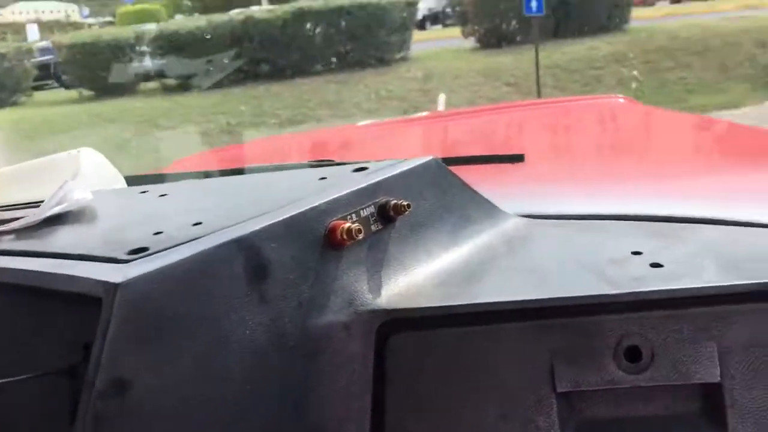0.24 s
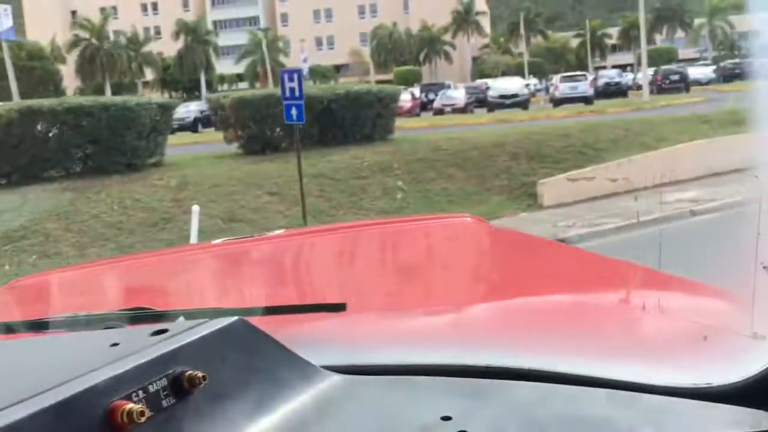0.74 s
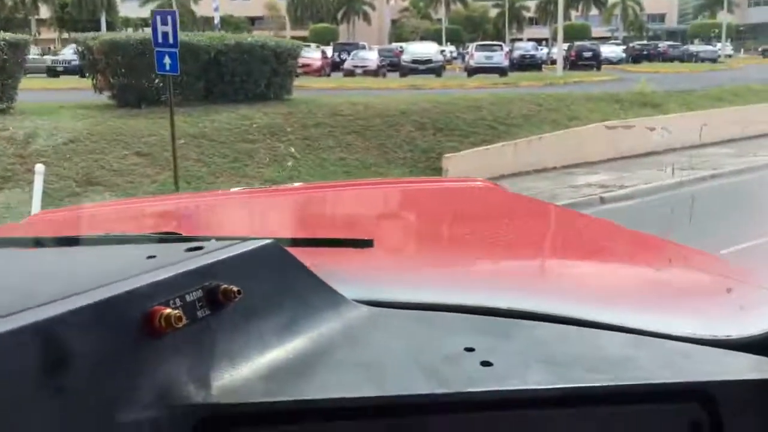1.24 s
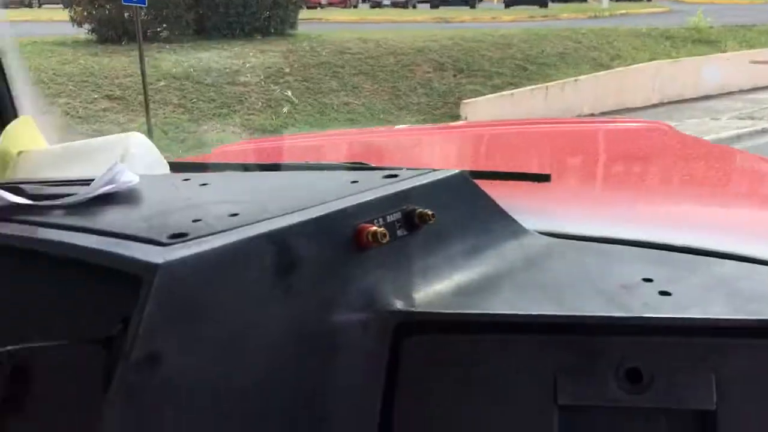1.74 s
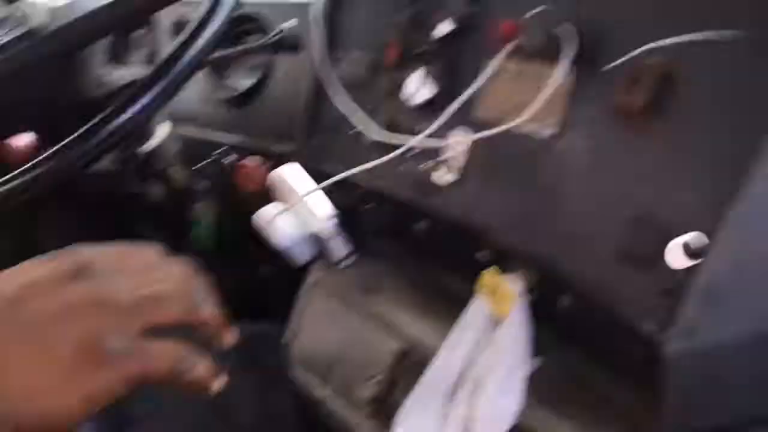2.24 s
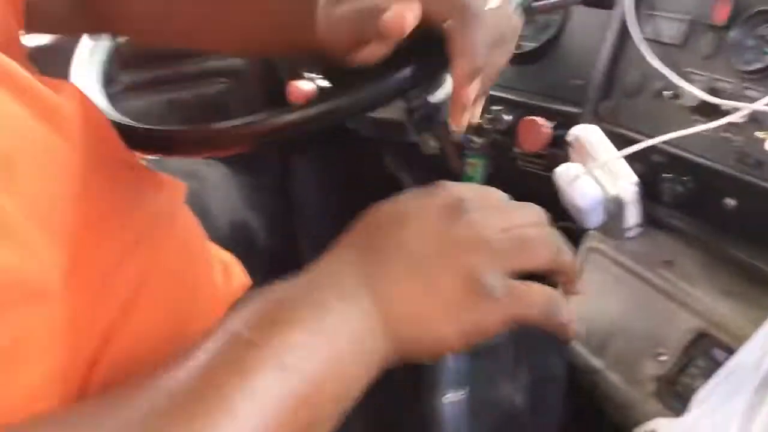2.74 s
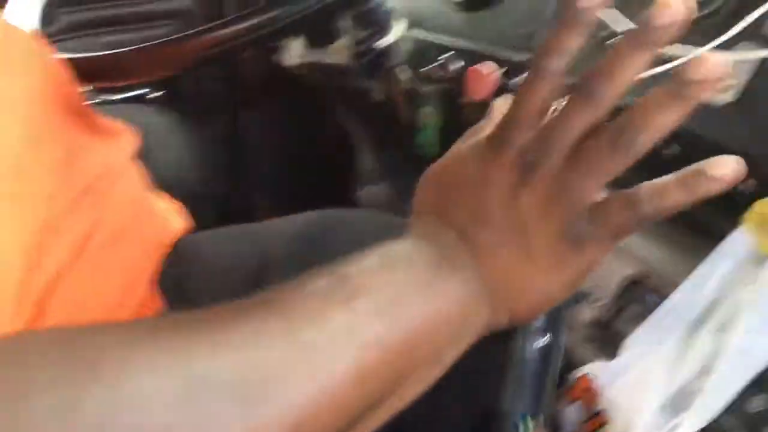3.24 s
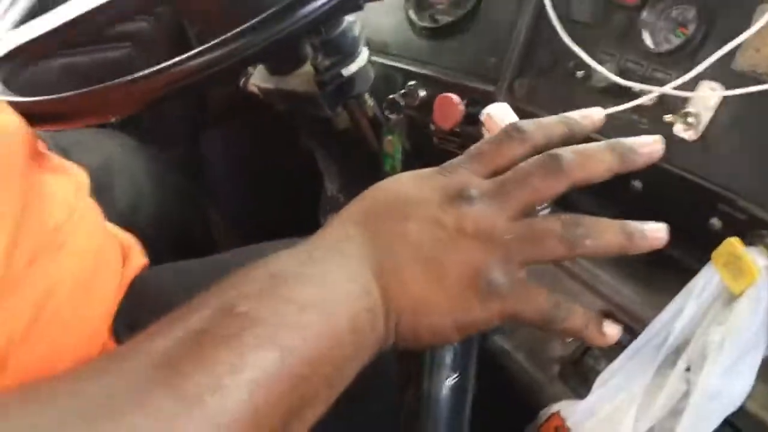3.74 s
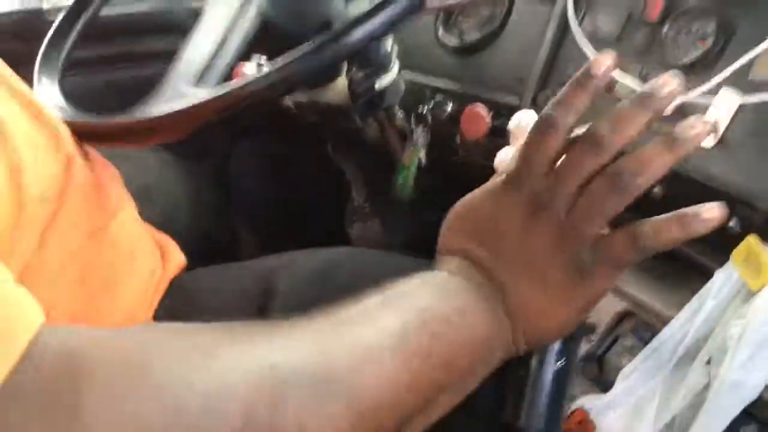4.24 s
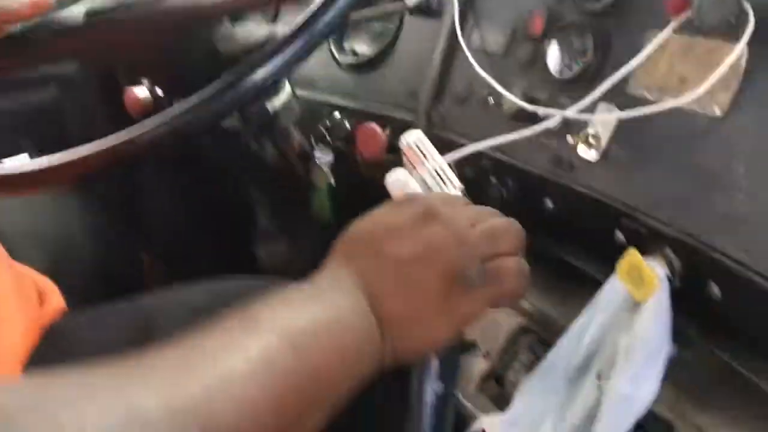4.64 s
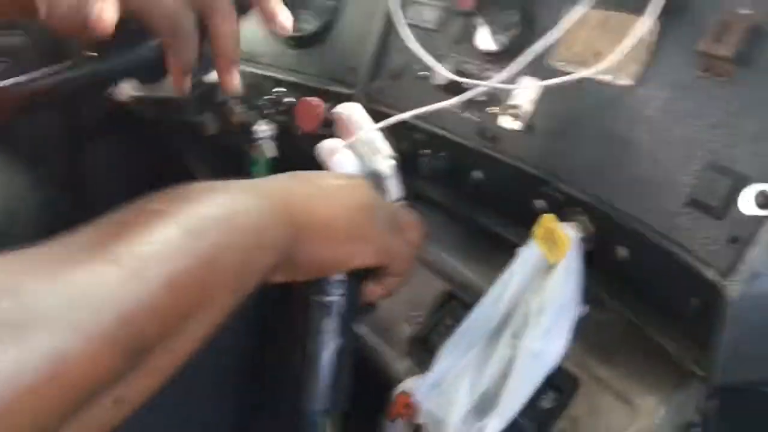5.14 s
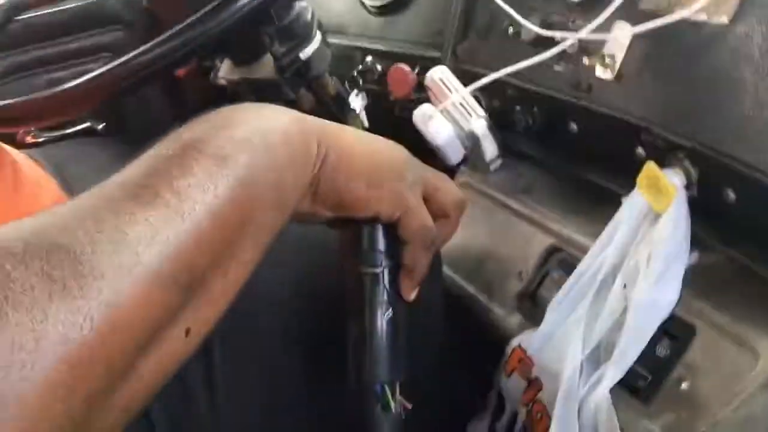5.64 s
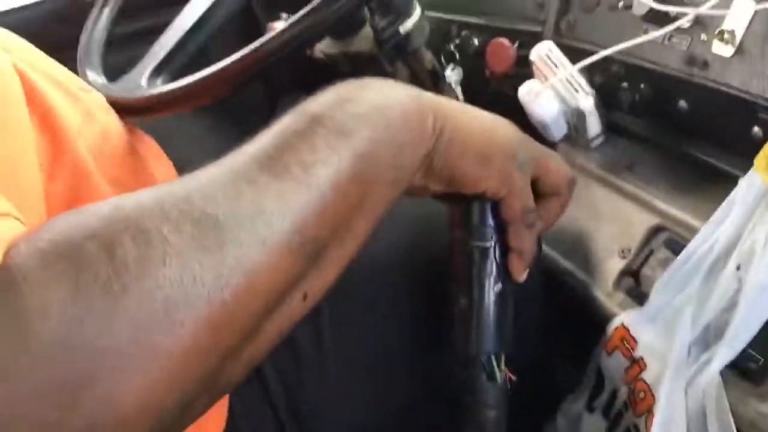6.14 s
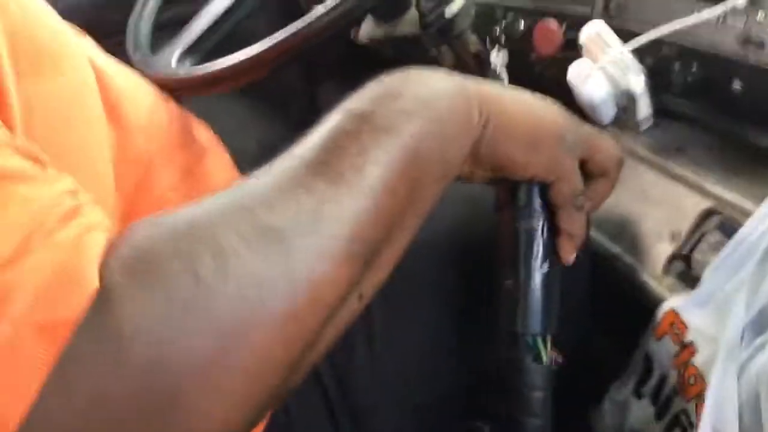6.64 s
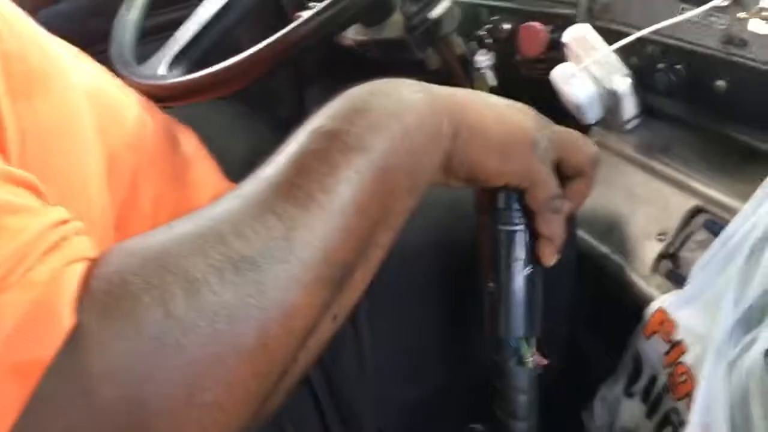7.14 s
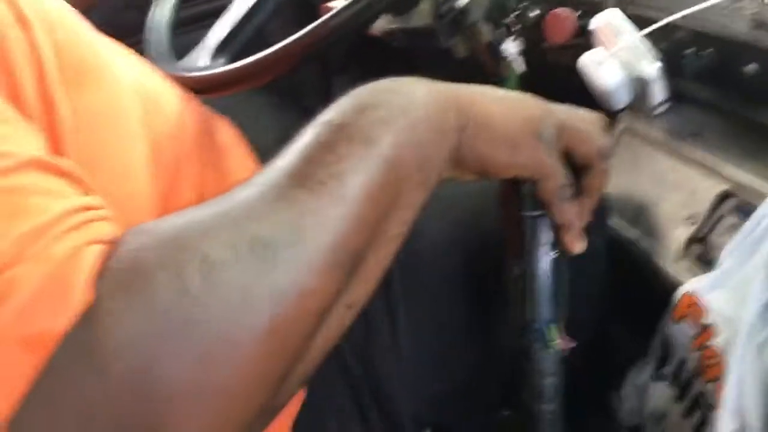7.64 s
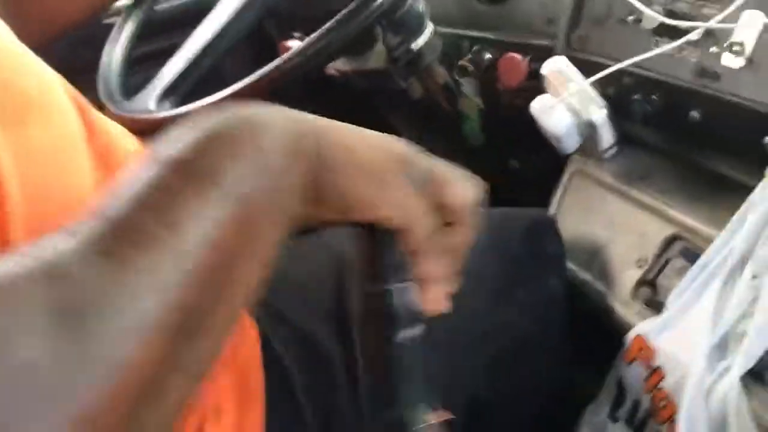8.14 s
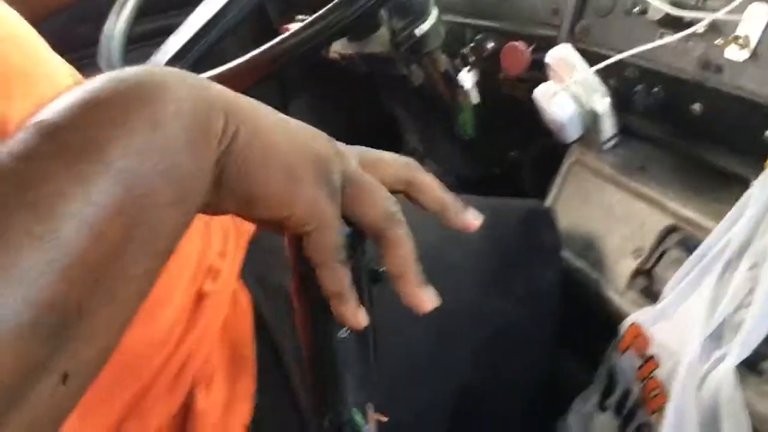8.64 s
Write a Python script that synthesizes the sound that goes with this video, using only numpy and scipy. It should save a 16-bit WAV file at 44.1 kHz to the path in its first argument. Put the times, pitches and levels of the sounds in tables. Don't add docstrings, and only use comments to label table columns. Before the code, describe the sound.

A loud truck diesel pulls hard, drops off, grinds and clunks into the next gear, then climbs again under a breathy turbo whistle.

```python
import sys
import numpy as np
from scipy import signal
from scipy.fft import rfft, irfft
from scipy.io import wavfile
from scipy.ndimage import uniform_filter1d

SR = 44100
rng = np.random.default_rng(int(sys.argv[2]) if len(sys.argv) > 2 else 0)


def master_out(mix):
    frames = np.transpose(np.atleast_2d(mix))
    ceiling = np.clip(frames, -1, 1)
    pcm = np.round(ceiling * 32767).astype(np.int16)
    wavfile.write(sys.argv[1], SR, pcm)


def how_loud(loudness_db):
    steps = np.asarray(loudness_db, float) / 20
    return 10 ** steps


N = 392931
TIME = np.arange(N) / SR

# time in seconds, effort in dB.
EFFORT = [(0, 5), (.15, -1), (1.4, 2), (2.0, 0.5), (2.7, -3.5), (3.06, -4), (3.2, 3), (3.38, 4),
          (3.6, -1.5), (3.8, 0.5), (4.15, 7), (4.3, 5.5), (4.5, 3.5), (6.0, 0.5), (7.0, -2.5), (8.05, -4),
          (8.36, -1), (8.7, 5.5)]


def level(x, db):
    return x * how_loud(db) / np.sqrt(np.mean(x ** 2))


def columns(table):
    s, *rest = np.transpose(table)
    return [np.interp(TIME, s, c) for c in rest]


def law(value, points):
    return np.interp(value, *np.transpose(points))


def walk(rate):
    return np.interp(TIME * rate, np.arange(1000), rng.standard_normal(1000))


def coloured(points):
    hz, db = np.transpose(points)
    f = np.maximum(np.arange(N // 2 + 1) * SR / N, 1)
    tilt = how_loud(np.interp(np.log(f), np.log(hz), db))
    return level(irfft(rfft(rng.standard_normal(N)) * tilt, N), 0)


def filtered(x, order, hz, kind):
    return signal.sosfilt(signal.butter(order, hz, kind, fs=SR, output="sos"), x)


def ring(x, modes, rate=0):
    total = 0
    for k, (hz, width, db) in enumerate(modes):
        swell_db = 3 * np.tanh(walk(rate)) if rate else 0
        mode = signal.lfilter(*signal.iirpeak(hz, hz / width, SR), x)
        total = total + (-1) ** k * how_loud(db + swell_db) * mode
    return total


def smeared(turns, width_hz):
    clock = np.cumsum(np.broadcast_to(width_hz, N)) / SR
    a, b = (np.interp(clock, np.arange(N), rng.standard_normal(N)) for _ in range(2))
    return a * np.sin(2 * np.pi * turns) + b * np.cos(2 * np.pi * turns)


def hits(events, carrier):
    shape = np.zeros(N)
    for s, db, t60 in events:
        start = int(s * SR)
        after = TIME[start:int((s + 2 * t60) * SR)] - s
        shape[start:start + len(after)] += how_loud(db - 60 * after / t60) * np.clip(after / 0.00019, 0, 1)
    return shape * carrier


def bumps_db(events):
    return sum(db * np.exp(-((TIME - s) / half) ** 2) for s, half, db in events)


def firing_rate():
    # time in seconds, firing rate in Hz.
    revs = [(0, 53.9), (.25, 54.98), (1.27, 73.1), (2.36, 94.15), (2.66, 95.8), (2.8, 86.96), (3.25, 81.9),
            (3.54, 96.6), (3.78, 95.2), (3.97, 68.34), (4.19, 66.55), (4.33, 60), (6.7, 85.67),
            (7.88, 96.2), (7.99, 87.15), (8.44, 72.55), (8.66, 72.7), (8.8, 70.4)]
    since = np.maximum(TIME - 4.27, 0)
    return columns(revs)[0] - 3.205 * np.sin(2 * np.pi * since / .41) * np.exp(-since / 1.26)


def boom_level(hz, fuel_db):
    # firing rate in Hz, boom in dB.
    cab_boom = [(50, -8), (55, -12.5), (63, -13), (72, -14), (80, -14), (89, -11), (95, -8)]
    # time in seconds, half length in seconds, boom in dB.
    surges = [
        (2.8, 0.011, -25),
        (2.937, 0.014, -13.5),
        (3.826, 0.023, -21),
        (4.07, 0.04, -23),
        (4.144, 0.033, -22),
        (4.28, 0.037, -10.5),
    ]
    coasting = np.clip(-fuel_db / 15, 0, 1) ** 2
    rocking = sum(how_loud(db) * np.exp(-((TIME - s) / half) ** 2) for s, half, db in surges)
    return 20 * np.log10(how_loud(law(hz, cab_boom) + fuel_db + 2 * coasting * walk(22)) + rocking)


def cab_boom_tones(cycles, hz, fuel_db, boom_db, cancel_hz):
    # firing rate in Hz, octave in dB.
    cab_octave = [(53, -23), (58, -19), (64, -19), (77, -23), (86, -30), (90, -30), (93, -28.5),
                  (96, -36.5)]
    cancelling = 0.017 + np.tanh(((hz - cancel_hz) / 4.2) ** 2)
    octave_db = law(hz, cab_octave) + 2.2 * fuel_db + 20 * np.log10(cancelling)
    boom = how_loud(boom_db + 0.2 * walk(18)) * np.sin(2 * np.pi * cycles)
    boom += how_loud(octave_db + 0.41 * walk(45)) * np.cos(2 * np.pi * (2 * cycles + .66))
    return np.sqrt(2) * boom


def exhaust_pipe(puffs, hz):
    # resonance in Hz, width in Hz, level in dB.
    pipe_modes = [(159.8, 11.4, 8), (186, 124, -14), (282, 9.2, -22)]
    pipe = filtered(ring(puffs, pipe_modes), 4, 140, "high")
    return level(pipe, -26.5) * np.clip((78 - hz) / 12, 0, 1)


def floor_panels(knocks, hz, fuel_db, boom_db, wake_hz, plate_db):
    # resonance in Hz, width in Hz, level in dB.
    panel_modes = [(56.4, 28, -1.5), (105.5, 30.3, 2.5), (186.1, 18.7, -6), (294.8, 22.3, -5.5),
                   (345.5, 54, -11), (676, 50, -7)]
    plate_hz = [392, 434]
    skirt_hz = [265, 385]
    # time in seconds, half length in seconds, extra dB.
    growls = [
        (2.31, 0.081, 4.5),
        (3.45, .07, 5.5),
        (4.273, 0.033, 10),
        (4.65, 0.27, 4),
        (8.62, 0.052, 9.5),
    ]
    load_db = uniform_filter1d(boom_db, SR // 10)
    panels = level(ring(ring(knocks, panel_modes), panel_modes), -14.5)

    rasp = level(rng.standard_normal(N), -10)
    plate = level(filtered(level(knocks, 0) + rasp, 3, plate_hz, "band"), 0)
    plate_db = plate_db - 1.28 * np.maximum(wake_hz - hz, 0) + 1.52 * fuel_db + 1.46 * walk(9)
    plate_db += bumps_db(growls)

    skirt = level(filtered(knocks, 2, skirt_hz, "band"), -10)
    skirt *= np.clip((94 - hz) / 14, 0, 1) * np.clip((hz - 54) / 18, .15, 1)
    return panels * how_loud(load_db) + skirt * how_loud(load_db - 7.5) + plate * how_loud(plate_db - 7.0)


def combustion_clatter(cycles, fuel_db, strain_db):
    # frequency in Hz, noise density in dB per Hz.
    clatter_spectrum = [(280, 0), (470, 1.5), (538, -1.5), (648, 2), (861, -2.5), (962, -1.5), (1140, -5),
                        (1340, -7), (2230, -10), (4970, -19), (7660, -24.5), (9000, -27.5), (11700, -67),
                        (19800, -120)]
    # resonance in Hz, width in Hz, level in dB.
    ringing = [(567, 9.1, -4.5), (716, 28, -5.5), (960, 50, -0.5), (1371, 41, 8), (1880, 8, 0),
               (2073, 60, 8), (2344, 36, 2), (2645, 34, 9), (3555, 220, -7.5), (3740, 23, -18)]
    gate = 1.9 + np.exp(-(cycles % 1) / 0.9)
    hiss = coloured(clatter_spectrum)
    block = level(ring(hiss, ringing, rate=7), -6.0) * how_loud(strain_db + 0.83 * fuel_db)
    clatter = level(gate * (hiss + block), 0)
    return clatter * how_loud(-32 + columns(EFFORT)[0] + 1.35 * walk(9))


def gear_mesh(hz):
    # multiple of firing rate, start in seconds, end in seconds, level in dB.
    mesh_tones = [
        (32.8, 6.55, 7.93, -52),
        (38.9, 6.3, 6.75, -48),
        (43.9, 7.1, 7.91, -50.5),
    ]
    steady = np.cumsum(uniform_filter1d(hz, SR // 12)) / SR
    whine = 0
    for teeth, a, b, db in mesh_tones:
        fade = np.interp(TIME, [a, a + 0.11, b - .05, b], [0, 1, 1, 0])
        tone = np.sin(2 * np.pi * teeth * steady) + .5 * smeared(teeth * steady, 25)
        whine = whine + how_loud(db) * fade * tone
    return whine


def engine():
    # time in seconds, fuel in dB.
    pedal = [(2.45, 0), (2.7, -5), (2.75, -23), (3.1, -14.5), (3.28, -2), (3.36, -2), (3.54, -0.5),
             (3.62, -8.5), (3.68, -12), (3.71, -18), (4.18, -8), (4.23, 3), (4.5, 1), (7.89, -0.5),
             (7.96, -18), (8.44, -12.5), (8.46, -2.5), (8.63, 2.5)]
    # start in seconds, firing rate in Hz up to which
    # the floor plate wakes, firing rate in Hz where the octave cancels, plate in dB, block ring in dB.
    gears = [
        (0, 78.84, 70.05, -18, 3),
        (3.1, 90.64, 95.9, -23, -2.5),
        (4.0, 71.66, 73.1, -15, -1),
        (8.199, 70, 75.56, -20.5, -8),
    ]
    cylinders = [0, -17, -22, -2.5, -19, -22]
    hz = firing_rate()
    fuel_db = columns(pedal)[0]
    by_gear = np.transpose(gears)
    gear_now = np.searchsorted(by_gear[0], TIME, "right") - 1
    wake_hz, cancel_hz, plate_db, strain_db = by_gear[1:, gear_now]
    boom_db = boom_level(hz, fuel_db)
    cycles = np.cumsum(hz * (1 + 0.0034 * walk(25))) / SR

    firings = np.flatnonzero(np.diff(np.floor(cycles)))
    scatter_db = 1.2 * rng.standard_normal(len(firings))
    puffs, knocks = np.zeros((2, N))
    puffs[firings] = how_loud(boom_db[firings])
    knocks[firings] = how_loud(np.resize(cylinders, len(firings)) + scatter_db)

    sound = cab_boom_tones(cycles, hz, fuel_db, boom_db, cancel_hz)
    sound += exhaust_pipe(puffs, hz)
    sound += floor_panels(knocks, hz, fuel_db, boom_db, wake_hz, plate_db)
    sound += combustion_clatter(cycles, fuel_db, strain_db)
    return sound + gear_mesh(hz)


def turbo():
    # time in seconds, lower wheel tone in Hz.
    spool = [(0, 5620), (.65, 7300), (1.0, 8320), (1.45, 9100), (1.85, 9750), (2.58, 10650), (2.8, 8670),
             (3.2, 6540), (3.52, 6805), (4.2, 5120), (5.1, 8150), (5.64, 9146), (6.35, 9925), (7.0, 10400),
             (7.89, 10750), (8.1, 8400), (8.5, 6397), (8.91, 7760)]
    # frequency in Hz, level in dB.
    blade = [(7300, -40), (8500, -38), (10500, -39.5), (13000, -39.5), (14500, -49), (15500, -47)]
    # frequency in Hz, level in dB.
    wheel = [(6300, -62), (7200, -56), (8100, -48.5), (8750, -44), (9100, -35), (9450, -45), (9800, -37.5),
             (10250, -53.5)]
    # frequency in Hz, noise density in dB per Hz.
    air_spectrum = [(2350, -23), (4000, 1.5), (4940, -7), (6000, -2), (7250, -8), (9260, -5), (10400, -8),
                    (12800, -9), (15700, -15)]
    wheel_hz = uniform_filter1d(columns(spool)[0], SR // 12)
    speeding_up = np.gradient(uniform_filter1d(wheel_hz, SR // 8)) > 0
    boost = uniform_filter1d(1. * speeding_up, SR // 8)

    blade_hz = wheel_hz * (1.435 - .03 * boost)
    width_hz = (700 + 600 * boost) * (blade_hz / 12000) ** 1.4
    upper = smeared(np.cumsum(blade_hz) / SR, width_hz)
    upper = upper * how_loud(law(blade_hz, blade) - 4.5 * (2 - boost))

    turns = np.cumsum(wheel_hz) / SR
    lower = smeared(turns, 550) + 0.22 * boost * smeared(turns, 120)
    lower = lower * how_loud(law(wheel_hz, wheel) - 5 * (1 - boost))

    air = coloured(air_spectrum)
    top = signal.sosfiltfilt(signal.butter(2, 10300, "high", fs=SR, output="sos"), air)
    air = air + top * (how_loud((blade_hz - 13400) / 1000) - 1)
    air_db = -43.5 + columns(EFFORT)[0] + 0.84 * walk(18)
    return upper + lower + air * how_loud(air_db)


def road():
    # frequency in Hz, noise density in dB per Hz.
    rumble_spectrum = [(12, -47), (24, -30), (40, 3.5), (87, 3.5), (193, -7.5), (216, -26), (248, -31),
                       (271, -17), (400, -13.5), (520, -47), (880, -120)]
    swell_db = 1.2 * walk(3) + 1.5 * walk(14)
    return coloured(rumble_spectrum) * how_loud(-26.5 + 1.1 * columns(EFFORT)[0] + swell_db)


def driveline_thumps():
    # time in seconds, peak in dB, time to fall 60 dB in seconds.
    thump_times = [
        (0.019, -22, 0.14),
        (1.719, -2, 0.0603),
        (2.928, -9, 0.14),
        (4.051, 0, 0.21),
        (4.118, -17, 0.096),
        (8.6, -16, 0.27),
    ]
    frame = ring(rng.standard_normal(N), [(60, 48, 7), (113, 32, -2), (390, 130, -13)])
    return filtered(hits(thump_times, level(frame, 0)), 2, 500, "low") * how_loud(-11.5)


def gearbox():
    # time in seconds, scrape in dB.
    grinds = [
        [(3.11, -56), (3.146, -35), (3.158, -30), (3.236, -27.5), (3.26, -25), (3.266, -42), (3.36, -24),
         (3.45, -19), (3.51, -59)],
        [(4.0, -35), (4.02, -31), (4.058, -29), (4.108, -24.5), (4.132, -38), (4.2, -41)],
    ]
    # time in seconds, peak in dB, time to fall 60 dB in seconds.
    clashes = [(2.805, -26.5, 0.045), (3.1422, -10, 0.063), (3.1614, -20, 0.08), (3.1843, -17.5, 0.08),
               (3.2079, -19, 0.081), (3.2276, -12.5, 0.044), (3.2654, -10, 0.049), (3.2815, -13.5, 0.21),
               (3.4042, -30, 0.15), (3.4277, -14.5, 0.1), (3.447, -11.5, 0.093), (3.49, -20, 0.05),
               (3.8805, -19.5, 0.061), (3.9438, -26, 0.12), (4.0394, -9.5, 0.067), (4.055, -4, 0.17),
               (4.0957, -8, 0.029), (8.3025, -18, 0.067), (8.3248, -30, 0.072)]
    # casing resonance in Hz, width in Hz, level in dB.
    casing_modes = [(1500, 250, -4), (1900, 250, -5), (2300, 250, 2), (2670, 120, -2), (3330, 150, 1),
                    (3550, 150, 2), (3720, 100, 0), (4310, 150, -3), (5550, 250, -13), (6650, 200, -14),
                    (8250, 300, -17), (9400, 500, -17), (11400, 500, -22)]
    # tooth resonance in Hz, width in Hz, level in dB.
    tooth_modes = [(3300, 130, -3), (3580, 130, 0), (3720, 100, -4), (4330, 150, 0)]
    grit = rng.standard_normal(N) * how_loud(2.0 * rng.exponential(size=N))
    broad = ring(grit, [(2120, 1700, 10), (8800, 7600, -1.0)])
    casing = level(ring(grit, casing_modes, rate=61) + 0.62 * broad, 0)
    teeth = level(ring(grit, tooth_modes), 0)
    scrape = 0
    for span in grinds:
        s, db = np.transpose(span)
        scrape = scrape + np.interp(TIME, s, how_loud(db), 0, 0)
    contact = scrape * how_loud(1.9 * walk(100) - 2.0) + hits(clashes, how_loud(-5.0))
    light_limit = how_loud(-33.5)
    light = light_limit * np.tanh(contact / light_limit)
    return casing * (contact - 0.97 * light) + teeth * light


def trim():
    # start in seconds, length in seconds, pitch in Hz, level in dB.
    squeaks = [
        (6.367, 0.036, 7100, -43),
        (8.595, .025, 7200, -35),
    ]
    sound = 0
    for s, length, hz, db in squeaks:
        fade = np.interp(TIME, [s, s + 0.003, s + length - .004, s + length], [0, 1, 1, 0])
        sound = sound + how_loud(db) * fade * smeared(hz * TIME, 150)
    return sound


def scene():
    dry = engine() + turbo() + road() + driveline_thumps() + gearbox() + trim()
    cab = rng.standard_normal(SR // 8) * how_loud(-60 * TIME[:SR // 8] / 0.12 - 34)
    echoes = signal.fftconvolve(signal.lfilter([1, -.95], 1, dry), cab)[:N]
    return (dry + echoes)[None]


def band_limit(x):
    return signal.sosfilt(signal.butter(12, 15820, fs=SR, output="sos"), x)


def record(dry):
    soft = np.tanh(0.79 * filtered(dry, 2, 40, "high"))
    mix = signal.sosfilt(signal.ellip(8, .2, 80, 15750, fs=SR, output="sos"), soft)
    return band_limit(mix)


dry = scene()
out = record(dry)
master_out(out)
```